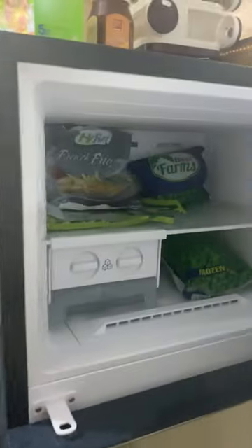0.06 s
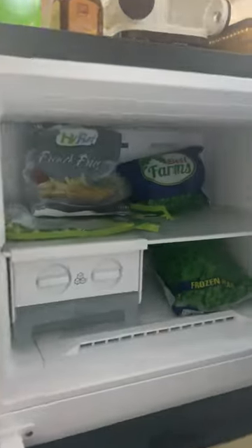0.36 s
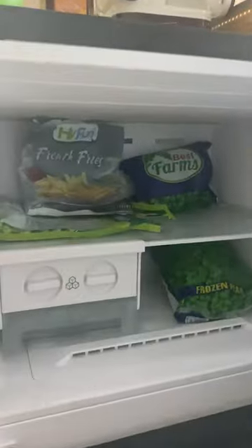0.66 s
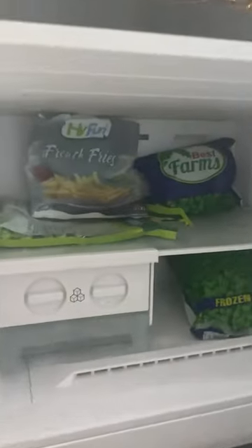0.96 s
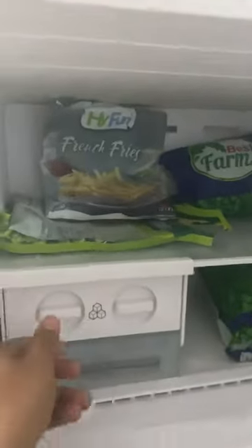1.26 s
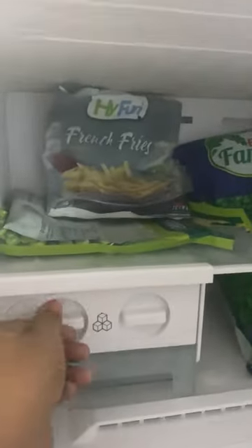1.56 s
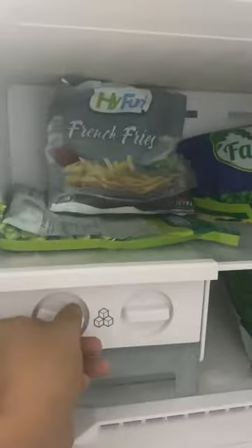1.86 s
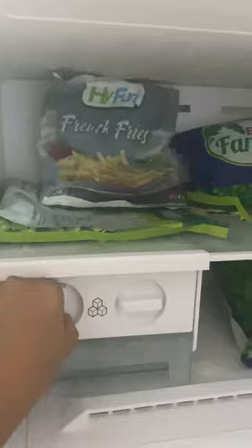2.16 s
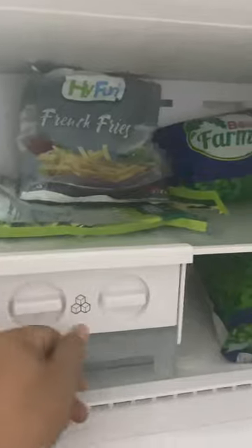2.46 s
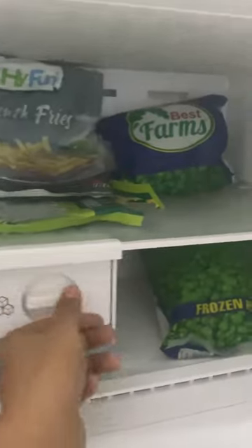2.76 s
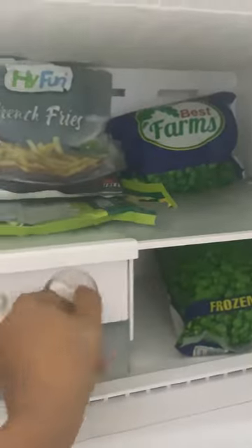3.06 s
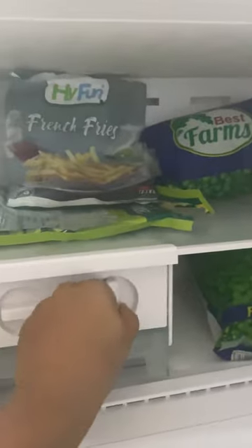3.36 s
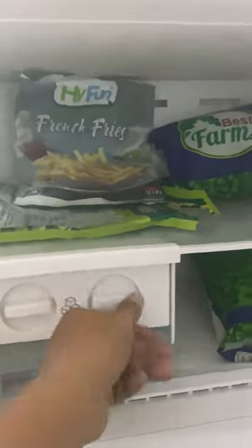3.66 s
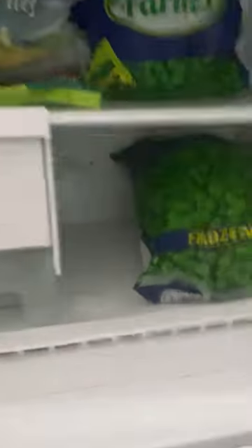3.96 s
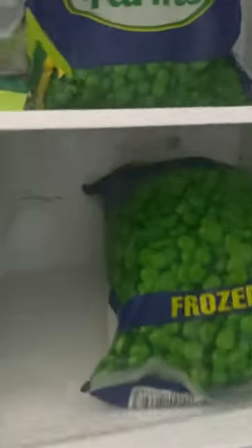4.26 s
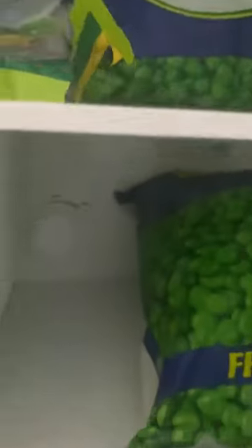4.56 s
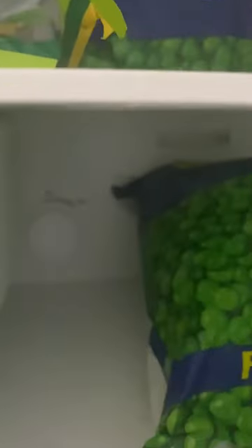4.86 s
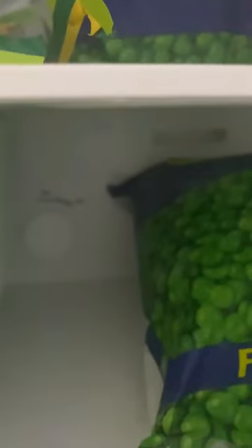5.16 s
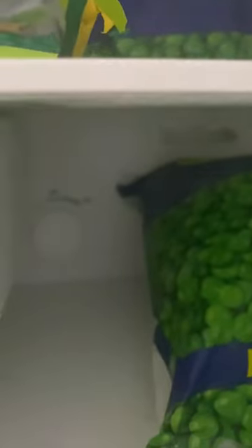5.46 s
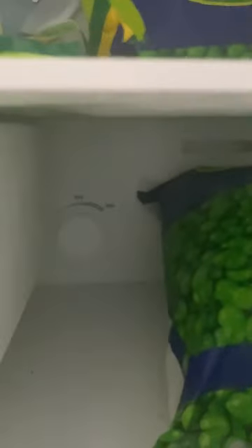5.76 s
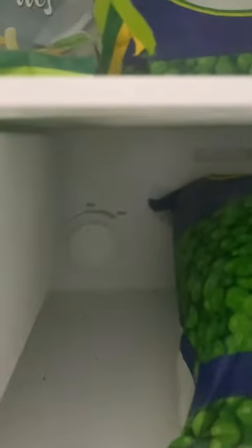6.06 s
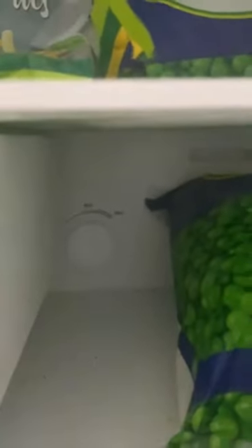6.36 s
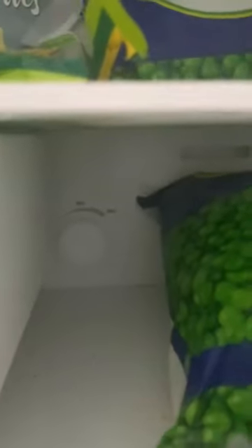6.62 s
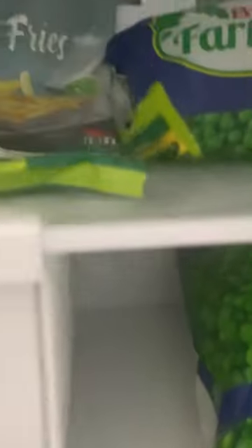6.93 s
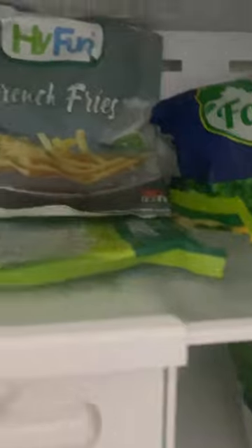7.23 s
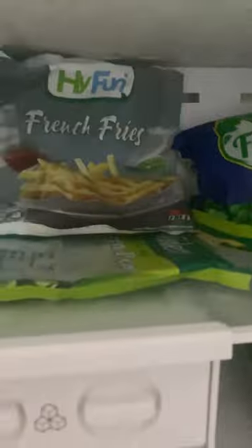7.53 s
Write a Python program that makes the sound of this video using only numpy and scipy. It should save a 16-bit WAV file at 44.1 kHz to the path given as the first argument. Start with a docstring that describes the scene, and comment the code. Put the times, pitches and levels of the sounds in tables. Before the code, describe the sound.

A freezer fan hums faintly at first, a low steady tone with a little moving air, slowly getting louder. From about 1.5 seconds a hand turns a plastic ice tray knob, which rubs and ticks lightly, then snaps back with a cluster of sharper clicks near 2.5 seconds. A second knob clicks from about 3 seconds and snaps back near 3.8 seconds. The clicks ring briefly and hollowly in the small compartment. Between 4 and 4.5 seconds the microphone moves toward the back wall, and the hum grows much louder, with a low throb and a rush and hiss of air. A light knock comes near 5.9 seconds, and a faint scuff and tick near 6.8. The drone is loudest from around 6.5 seconds, and the air turns slightly brighter near the upper vents, running on until about 8 seconds.

```python
"""Inside an open freezer. The fan hums and blows through its duct: tones locked to the motor, plus
turbulence that booms, rushes and hisses. A hand turns the two plastic knobs of the ice trays; they
rub, click and snap back, ringing in the compartment. Then the microphone moves in towards the back
wall, where hum and air grow much louder, and rises to the upper vent slots."""
import sys
import numpy as np
from scipy import signal
from scipy.fft import rfft, irfft, next_fast_len
from scipy.io import wavfile
from scipy.ndimage import uniform_filter1d

SR = 44100
rng = np.random.default_rng(int(sys.argv[2]) if len(sys.argv) > 2 else 0)


def pcm_store(signal):
    """Save signal as 16-bit PCM."""
    levels = np.round(np.clip(np.atleast_2d(signal), -1, 1) * 32767)
    wavfile.write(sys.argv[1], SR, levels.astype(np.int16).T)


N = 343539
TIME_S = np.arange(N) / SR


def from_db(db):
    """Decibels to gain."""
    return 10 ** (np.asarray(db) / 20)


def unit_rms(x):
    """Scale to rms 1."""
    return x / np.sqrt(np.mean(x ** 2) + 1e-20)


def at_hz(points, hz):
    """Interpolate on a log-frequency axis."""
    points_hz, values = np.transpose(points)
    return np.interp(np.log(hz + 1), np.log(points_hz), values)


def drift(rate_hz):
    """Low-passed random wander, rms 1."""
    hz = np.arange(N // 2 + 1) * SR / N
    return unit_rms(irfft(rfft(rng.standard_normal(N)) / (1 + (hz / rate_hz) ** 2) ** 2, N))


def noise(spectrum, coherence, size=N):
    """Coloured stereo noise, rms 1, rolled off beyond the spectrum's ends."""
    padded = next_fast_len(size)
    hz = np.arange(padded // 2 + 1) * SR / padded
    rolloff = (1 + (hz / (2 * spectrum[-1][0])) ** 4) * (1 + (spectrum[0][0] / 2 / (hz + 1)) ** 2)
    mid, side = rfft(rng.standard_normal((2, padded))) * from_db(at_hz(spectrum, hz)) / rolloff
    alike = np.clip(at_hz(coherence, hz), -1, 1)
    mid, side = mid * np.sqrt(1 + alike), side * np.sqrt(1 - alike)
    return unit_rms(irfft(np.array([mid + side, mid - side]), padded)[:, :size])


def resonate(x, hz, width_hz, gain_db):
    """Boost or cut one band."""
    return x + (from_db(gain_db) - 1) * signal.lfilter(*signal.iirpeak(hz, hz / width_hz, fs=SR), x)


def decay(t, t60_s):
    """Exponential decay."""
    return np.exp(-np.log(1000) * t / max(t60_s, 1e-3))


def damped_sine(t, hz, db, t60_s):
    """One decaying mode."""
    return from_db(db) * np.sin(2 * np.pi * hz * t) * decay(t, t60_s)


def bell(at_s, half_width_s):
    """Gaussian envelope."""
    return np.exp(-((TIME_S - at_s) / half_width_s) ** 2)


def swell_gain(rows):
    """Gain curve of brief swells or dips."""
    return from_db(sum(db * bell(at_s, half_width_s) for at_s, db, half_width_s in rows))


def add(out, at_s, sound):
    """Mix a sound in at a time."""
    start = round(at_s * SR)
    out[:, start:start + sound.shape[1]] += sound[:, :out.shape[1] - start]


def mic_rise(from_s=6.95, to_s=7.73):
    """The microphone's rise to the upper slots, 0 to 1."""
    return np.interp(TIME_S, [from_s, to_s], [0, 1])


# Microphone's approach to the fan: (time [s], nearness [dB])
NEARNESS = [(0.05, -58), (1.37, -50.5), (3.82, -46), (4.57, -34.5), (5.5, -31.5), (5.72, -33), (6.59, -27),
            (6.67, -27.5), (6.89, -26.5), (7.7, -28)]

def reach(wall_db, slope, slots_db, wall_nearness_db=-26.5):
    """Source gain: wall_db at the back wall, slope dB per dB of nearness, slots_db more once risen."""
    near_db = np.interp(TIME_S, *np.transpose(NEARNESS)) - wall_nearness_db
    return from_db(wall_db + slope * near_db + slots_db * mic_rise())


# Wall reflections: (delay [ms], gain [dB])
WALLS = [(1.6, -14.5), (2.7, -15), (3.9, -18.5), (6.3, -15), (9.1, -18)]

def compartment(x):
    """Close walls comb-filter the sound."""
    out = x.copy()
    for delay_ms, db in WALLS:
        add(out, delay_ms / 1000, from_db(db) * x)
    return out


def shelf_echo(x, echo_db=-8, delay_ms=1.85, rise_ms=-0.5):
    """The shelf's echo arrives sooner as the microphone rises, sliding its comb upward."""
    delayed_s = TIME_S - (delay_ms + rise_ms * mic_rise()) / 1000
    echo = np.array([np.interp(delayed_s, TIME_S, channel) for channel in x])
    return unit_rms(x + from_db(echo_db) * echo)


# Left-right likeness of the air: (frequency [Hz], coherence)
AIR_COHERENCE = [(60, 1), (130, 0.97), (290, 0.96), (640, 0.41), (1400, 0.71), (4400, 0.5), (7300, 0.84),
                 (15000, 0.83)]
# Duct turbulence: (frequency [Hz], density [dB])
BOOM_SPECTRUM = [(20, -42), (45, -26), (80, -17), (105, -5.5), (128, 4), (160, -2.5), (185, -2.5),
                 (220, -4), (265, -14), (330, -32), (450, -44.5)]
# Boom swells: (time [s], gain [dB], half width [s])
BOOM_SWELLS = [(4.85, 2, 0.17), (6.11, 3, 0.12), (7.19, 5, 0.022)]

def duct_boom():
    """Turbulence resonates in the duct; the steady flow throbs quickly but holds its average level."""
    boom = resonate(noise(BOOM_SPECTRUM, AIR_COHERENCE), hz=126.86, width_hz=5.5, gain_db=8)
    running_rms = np.sqrt(uniform_filter1d(np.mean(boom ** 2, axis=0), size=SR // 6))
    return reach(-30.5, 0.89, -0.25) * swell_gain(BOOM_SWELLS) * boom / running_rms


# Air at the vent edges: (frequency [Hz], density [dB])
HISS_SPECTRUM = [(1000, -6), (1700, 3), (2050, 4.5), (2400, 1.5), (2850, 1), (3600, -10), (4100, -8.5),
                 (4600, -12), (5200, -11), (6500, -20), (10000, -27), (13000, -28), (16000, -40.5)]
# Compartment resonances: (frequency [Hz], width [Hz], gain [dB])
HISS_PEAKS = [(1500, 130, 4), (1900, 110, 3), (2600, 150, -5), (2730, 110, 4.5), (3300, 180, 4),
              (4060, 180, 3.5), (5050, 250, 3)]
# Passing the shelf edge: (time [s], gain [dB], half width [s])
HISS_SWELLS = [(7.3, 2, 0.3)]

def edge_hiss(room_db=-88):
    """Air hisses at the vent edges, coloured by walls and shelf; some fills the room."""
    hiss = shelf_echo(compartment(noise(HISS_SPECTRUM, AIR_COHERENCE)))
    for hz, width_hz, gain_db in HISS_PEAKS:
        hiss = resonate(hiss, hz, width_hz, gain_db)
    return np.hypot(reach(-71.5, 0.93, 2.3), from_db(room_db)) * swell_gain(HISS_SWELLS) * hiss


# Flow through the vents and the upper slots: (frequency [Hz], density [dB])
RUSH_SPECTRUM = [(200, -25), (290, 6), (335, 2.5), (400, -8.5), (435, -4.5), (475, 0), (560, -10),
                 (690, -12.5), (800, -13), (930, -21.5), (1130, -30), (1520, -22), (1800, -33.5),
                 (2600, -55)]
SLOT_SPECTRUM = [(450, -21), (600, 8), (700, -4.5), (950, -6.5), (1100, -4), (1230, -3), (1400, -11),
                 (1700, -24.5)]

def vent_rush(room_db=-69):
    """Air rushes through the vents into the room; the upper slots grow louder as the microphone rises."""
    vents = resonate(noise(RUSH_SPECTRUM, AIR_COHERENCE), hz=1485, width_hz=120, gain_db=1.5)
    slots = noise(SLOT_SPECTRUM, AIR_COHERENCE)
    return np.hypot(reach(-44, 0.98, -5), from_db(room_db)) * vents + reach(-70, 0.22, 15) * slots


def harmonics(motor_rad, lines):
    """Sines locked to the motor; turbulence makes each flutter."""
    out = 0
    for multiple, level_db, flutter_db in lines:
        gain = from_db(level_db + flutter_db * drift(3.6))
        out += gain * np.sin(multiple * motor_rad + rng.uniform(0, 2 * np.pi))
    return np.sqrt(2) * out


MOTOR_HZ = 49.593
# Blade and motor tones: (multiple of motor rate, relative level [dB], flutter [dB])
BLADE_LINES = [(3, -1.5, 0.5)]
OVERTONE_LINES = [(6, -18.5, 1.1), (9, -25.5, 0.62), (15, -47.5, 0.98)]
BUZZ_LINES = [(8, -1, 2.5), (12, 1.5, 0.6), (16, -9, 2), (17, -14, 4.5), (18, -14.5, 2)]
HIGH_BUZZ_LINES = [(23, -20.5, 1.4), (24, -6, 1.5), (26, -18.5, 2.2), (28, -25.5, 0.49)]
WHINE_LINES = [(20, 0.43, 0.43)]
# Standing-wave nodes the microphone crosses: (time [s], gain [dB], half width [s])
WHINE_NODES = [(4.22, -18.5, 0.2), (7.26, -12, 0.16)]

def fan(wander_hz=0.03):
    """Blade tone, buzz and whine share one nearly steady motor speed."""
    motor_rad = 2 * np.pi * np.cumsum(MOTOR_HZ + wander_hz * drift(0.98)) / SR
    blade = reach(-25.5, 0.96, -0.046) * harmonics(motor_rad, BLADE_LINES)
    overtones = reach(-29, 1, -1) * harmonics(motor_rad, OVERTONE_LINES)
    buzz = reach(-61.5, 0.84, 3.1) * harmonics(motor_rad, BUZZ_LINES)
    high_buzz = reach(-62, 0.96, 7.3) * harmonics(motor_rad, HIGH_BUZZ_LINES)
    whine = reach(-59.5, 0.68, 4.4) * harmonics(motor_rad, WHINE_LINES)
    return blade + overtones + buzz + high_buzz + swell_gain(WHINE_NODES) * whine


def motor_drive(switching_hz=12000, gain_db=-64, flutter_db=3):
    """A very faint fluttering switching tone, split in two by the blade rate."""
    blade = np.sin(2 * np.pi * 3 * MOTOR_HZ * TIME_S)
    sidebands = 2 * blade * np.sin(2 * np.pi * switching_hz * TIME_S)
    return from_db(gain_db + flutter_db * drift(30)) * reach(-25.5, 0.96, -0.046) * sidebands


# Hand bumps and one light knock: (time [s], level [dB], pitch [Hz], t60 [s])
BUMPS = [(2.43, -39.5, 257.3, 0.07), (3.963, -44, 44.7, 0.1), (4.608, -46.5, 46.16, 0.19),
         (5.9092, -31.5, 563, 0.015), (5.926, -40, 49.6, 0.1)]

def bumps():
    """Each bump is a few dull cycles, alike in both channels."""
    out, t = np.zeros((2, N)), np.arange(SR // 4) / SR
    for at_s, db, hz, t60_s in BUMPS:
        bump = damped_sine(t, hz, db, t60_s) * (1 - decay(t, 0.028 * t60_s))
        add(out, at_s, bump[None])
    return out


# Left-right likeness of the handling sounds: (frequency [Hz], coherence)
KNOB_COHERENCE = [(200, 0.99), (1000, 0.28), (3000, 1), (4300, 0.58), (7000, 1), (14000, 0.47)]
# Broad hiss, for scuffs and microphone self-noise: (frequency [Hz], density [dB])
BROAD_SPECTRUM = [(500, 9.5), (3000, 5), (7000, 1), (12000, 0), (16000, -7.5)]
# Brushes, squeaks, tiny ticks: (time [s], level [dB], half width [s], pitch [Hz], Q per pass)
SCUFFS = [(0.143, -88, 0.11, 3400, 30), (.68, -70.5, .2, 397, 2.9), (.84, -91, .04, 11900, 6),
          (1.033, -92, .04, 5700, 6), (1.443, -91, .04, 4900, 4.6), (4.015, -77, 0.024, 4930, 1.9),
          (4.457, -78.5, .05, 2600, 5), (4.826, -65.5, 0.056, 1052, 19), (5.589, -83.5, 0.0055, 10900, 5.6),
          (5.742, -86, 0.0043, 10000, 3), (6.34, -90, .012, 11200, 3), (6.55, -86, 0.009, 8800, 5),
          (6.644, -87, 0.0054, 10000, 3), (6.727, -89, .005, 10300, 4.2), (6.785, -72.5, 0.03, 4040, 5.3),
          (6.802, -80, .05, 5400, 2.7), (6.929, -72, 0.0046, 7860, 5.7), (7.168, -75, 0.014, 4400, 32),
          (7.196, -76, .016, 4140, 28), (7.43, -78, 0.13, 4460, 5.6), (7.51, -88.5, .06, 11300, 4.3)]

def scuffs(grain_db=3):
    """Short slips swell and fade, each ringing roughly at one pitch."""
    out, friction = 0, noise(BROAD_SPECTRUM, KNOB_COHERENCE)
    for at_s, db, half_width_s, hz, q in SCUFFS:
        band = signal.iirpeak(hz, q, fs=SR)
        slip = unit_rms(signal.lfilter(*band, signal.lfilter(*band, friction)))
        out += from_db(db) * bell(at_s, half_width_s) * slip
    return out * from_db(grain_db * drift(100))


# Body of the plastic, and treble of skin sliding on it: (frequency [Hz], density [dB])
PLASTIC_SPECTRUM = [(130, -10.5), (230, 6.5), (400, 2.5), (600, 6), (900, 3), (1250, -3.5), (2000, -5.5),
                    (3000, -2.5), (4000, -9), (5500, -16.5), (7000, -19), (10000, -35)]
FRICTION_SPECTRUM = [(3500, -3), (5000, 3.5), (6500, 3), (8500, 2), (11500, 0.5), (13300, -5), (15000, -7),
                     (16000, -17)]
# Finger strokes: (time [s], level [dB], half width [s])
RUBS = [(.02, -78.5, 0.066), (.57, -77, 0.061), (.84, -84, 0.045), (1.58, -74.5, 0.077),
        (1.685, -86, 0.023), (1.795, -72.5, 0.062), (1.965, -68.5, 0.037), (2.035, -73.5, 0.034),
        (2.16, -66, 0.065), (2.36, -71.5, 0.087), (2.45, -55.5, 0.054), (2.81, -73, 0.037),
        (2.89, -74.5, 0.027), (3.0, -74.5, 0.092), (3.149, -64.5, 0.081), (3.27, -73, 0.043),
        (3.39, -71, 0.054), (3.63, -73, 0.15), (3.82, -70.5, 0.097), (4.468, -75.5, 0.059),
        (6.81, -72.5, .09), (7.501, -77, 0.076)]

def rubs(grain_db=2, snap_spread_db=4, treble_db=-9):
    """Skin sticks and slips on the plastic, breaking the treble into tiny snaps."""
    body = noise(PLASTIC_SPECTRUM, KNOB_COHERENCE)
    snaps = unit_rms(noise(FRICTION_SPECTRUM, KNOB_COHERENCE) * from_db(snap_spread_db * drift(2500)))
    slide = body + from_db(treble_db) * compartment(snaps)
    strokes = sum(from_db(db) * bell(at_s, half_width_s) for at_s, db, half_width_s in RUBS)
    return strokes * from_db(grain_db * drift(120)) * slide


# Knob modes: (frequency [Hz], level [dB], t60 [s])
KNOB_MODES = [(1934, -11.5, 0.12), (2330, -14, .12), (2540, -11, 0.092), (2640, -14, .11),
              (2787, -11.5, 0.13), (2890, 1, 0.081), (3260, -8.5, 0.097), (4926, -19.5, 0.094)]

def knob_ring(t, spread_db=2):
    """The knob's modes, struck together, a little differently each time."""
    modes = sum(damped_sine(t, hz, db + rng.normal(0, spread_db), t60_s) for hz, db, t60_s in KNOB_MODES)
    return modes * (1 - decay(t, 0.005))


# Treble of a click: (frequency [Hz], density [dB])
CRACK_SPECTRUM = [(3500, -5.5), (5000, 5.5), (6500, -1.5), (8000, 0.5), (10000, -4.5), (12000, -8),
                  (13300, -9.5), (16000, -25)]
# Knob and tray clicks: (time [s], level [dB], treble [dB], decay scale [s], ping [Hz], tick [dB],
# knob ring [dB], hollow [Hz], hollow boost [dB])
CLICKS = [(1.1212, -70, -25, 0.05, 1900, -4, -12, 950, 11),
          (1.511, -65.5, 1.5, 0.065, 1890, -9, -3, 940, 14),
          (1.523, -57, -25, 0.059, 1100, -1, -14, 695, 11.5), (1.55, -70, -7, 0.056, 5060, 4, -15, 950, 4),
          (1.575, -56.5, -8.5, 0.11, 1870, -3, -1, 960, -14),
          (1.8862, -58.5, -7.5, 0.055, 1550, -9, -7, 930, 8), (1.948, -65, -3, 0.045, 1700, -5, -1, 960, 9),
          (1.9587, -50, -16, 0.071, 1500, -6, -14, 956, 12.5),
          (1.9756, -49.5, 0, 0.013, 4810, 20, -15, 990, 0),
          (2.0837, -57.5, -12, 0.11, 2100, -2, -8, 954, 1), (2.1018, -58, 0, 0.038, 2860, 2, -6, 945, -4),
          (2.164, -54, -10, 0.13, 1810, -4, -11, 945, -5),
          (2.189, -51.5, -22, 0.062, 1362, -1, -8, 1016, 9),
          (2.283, -40.5, -18.5, 0.058, 1650, -13, -4, 910, -17),
          (2.288, -44, -33.5, 0.058, 1513, -6, -21, 967, 9), (2.39, -64, -5, .05, 1700, -6.5, -10, 950, 8),
          (2.425, -43, -27, 0.12, 1857, -6, -7, 500, 7), (2.4631, -31, 0.5, 0.1, 2790, 21, 8.5, 980, 11),
          (2.4727, -34.5, -18, 0.073, 1500, -7, -14, 522, 9), (2.4865, -37, -11, 0.15, 950, 6, -7, 926, 13),
          (2.496, -41.5, -3, 0.057, 3900, 2.5, -8, 1020, 3),
          (2.5043, -35.5, -7.5, 0.13, 2724, 1, 0, 760, 3),
          (2.7738, -58.5, -16.5, 0.049, 2310, 5, -12, 950, 3),
          (2.8685, -78, 10, 0.039, 2850, 0, -14, 950, -2),
          (2.9, -67.5, -30, 0.056, 1106, 0, -16, 977, 19.5),
          (3.0496, -79, -5, 0.037, 5000, 5, -10, 950, -1), (3.0829, -36, -23, 0.094, 1860, 7, -3, 860, 4.5),
          (3.0862, -38.5, -12, 0.067, 1880, 0, -10, 845, 12),
          (3.1179, -39, -19, 0.086, 1790, -6, -13, 935, 6.5),
          (3.125, -47.5, -28, 0.044, 1500, -3, -11, 620, 6),
          (3.3537, -36.5, -14, 0.1, 1520, -5, 2, 990, 3.5),
          (3.3732, -42.5, -21, 0.11, 1450, -9, -11, 500, 7.5),
          (3.516, -36.5, -22, 0.079, 2000, 3, -5, 454, -1.5),
          (3.6528, -51, -6.5, 0.039, 1710, -4, -4, 930, -6), (3.7435, -47.5, 2, 0.1, 5630, 9, 1, 860, -6),
          (3.7568, -35.5, -1, 0.082, 2570, 0.5, 7, 820, 1), (3.768, -35, -9.5, 0.12, 1410, -5, 3, 845, 3),
          (5.9093, -44, -19.5, 0.0069, 1414, 5.5, -16, 880, -2.5),
          (6.834, -60.5, -9.5, 0.11, 1550, -5.5, -8, 950, 1)]

def clicks(gain_db=-6.5, crack_gain_db=7, note_gain_db=-12, room_db=-23, room_t60_s=0.44):
    """A struck part cracks and pings, the tray adds a hollow note, the room a faint tail."""
    out, t = np.zeros((2, N)), np.arange(SR // 3) / SR
    tail = from_db(room_db) * decay(t, room_t60_s)
    for at_s, db, treble_db, decay_s, ping_hz, tick_db, ring_db, hollow_hz, hollow_db in CLICKS:
        ping_db = 8 + 11 * np.log2(ping_hz / 1770)  # smaller, higher parts ping more clearly
        body = noise(PLASTIC_SPECTRUM, KNOB_COHERENCE, size=len(t))
        body *= decay(t, 0.017) + decay(t, 1.28 * decay_s) + tail
        body = resonate(body, ping_hz, width_hz=600, gain_db=ping_db)
        body = resonate(body, hollow_hz, width_hz=150, gain_db=hollow_db)
        body *= 1 - decay(t, 0.014)  # builds more slowly than the crack
        crack = noise(CRACK_SPECTRUM, KNOB_COHERENCE, size=len(t))
        crack *= from_db(3) * decay(t, 0.0048) + decay(t, 0.52 * decay_s) + tail / 2
        crack = from_db(treble_db + crack_gain_db) * compartment(crack) * (1 - decay(t, 0.0054))
        tick = damped_sine(t, ping_hz, tick_db, t60_s=0.014) * (1 - decay(t, 0.007))
        ring = from_db(ring_db) * knob_ring(t)
        note = damped_sine(t, hollow_hz, hollow_db + note_gain_db, t60_s=0.085) * (1 - decay(t, 0.028))
        add(out, at_s, from_db(db + gain_db) * (body + crack + tick + ring + note))
    return out


# Ice tray housing resonances: (frequency [Hz], width [Hz], gain [dB])
HOUSING = [(222, 55, 14), (450, 40, 0.5), (743, 12, 3), (987.7, 23, 9.5), (1130, 13, 2.5), (1290, 65, 5.5),
           (1490, 69, 5), (1800, 25, 2), (1945, 25, 0.5), (2390, 38, 2.5), (2540, 70, 5), (2787, 30, 4),
           (2900, 34, 0.5), (3240, 34, 4), (3850, 35, 4), (4170, 40, 1.5), (4925, 40, 1), (5250, 35, 3),
           (6250, 55, 4)]

def knobs(low_cut_hz=150):
    """Clicks and rubs resonate in the housing; its light parts radiate no bass."""
    out = clicks() + rubs()
    for hz, width_hz, gain_db in HOUSING:
        out = resonate(out, hz, width_hz, gain_db)
    return signal.sosfilt(signal.butter(2, low_cut_hz, "high", fs=SR, output="sos"), out)


def scene():
    """Fan and air, with the hand in front."""
    return fan() + motor_drive() + duct_boom() + edge_hiss() + vent_rush() + knobs() + scuffs() + bumps()


# Stereo widening: (frequency [Hz], left lead [rad])
STEREO_PHASE = [(20, 0.6), (130, 0.19), (300, -0.25), (850, 0.5), (1200, 1), (1500, -1.56), (2000, 1),
                (2450, 2), (3300, 2), (4400, 1.65), (4800, 1.7), (5300, .5), (7300, 3), (10000, 5.5),
                (11200, 6.5), (13200, 9), (14200, 10), (15500, 12)]
# Stereo balance: (frequency [Hz], left minus right [dB])
STEREO_BALANCE = [(60, 6.5), (130, -2), (380, -4), (750, 2), (1100, 4.5), (1600, -1.5), (3400, .5),
                  (4700, -2), (7000, 0)]

def record(dry, self_noise_db=-95, cutoff_hz=15900):
    """Faint hiss, stereo widening (left-right phase and level vary with frequency) and a treble cut."""
    dry = dry + from_db(self_noise_db) * noise(BROAD_SPECTRUM, AIR_COHERENCE)
    padded = next_fast_len(N + SR // 10)
    hz = np.arange(padded // 2 + 1) * SR / padded
    split = np.array([[0.5], [-0.5]])
    widening = np.exp(1j * split * at_hz(STEREO_PHASE, hz)) * from_db(split * at_hz(STEREO_BALANCE, hz))
    heard = irfft(rfft(dry, padded) * widening, padded)[:, :N]
    return signal.sosfilt(signal.ellip(10, 0.1, 70, cutoff_hz, fs=SR, output="sos"), heard)


dry = scene()
out = record(dry)
pcm_store(out)
```